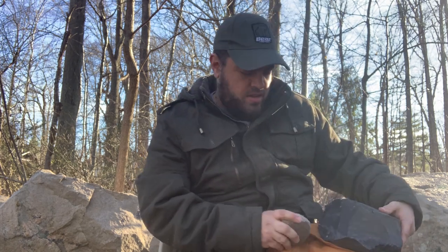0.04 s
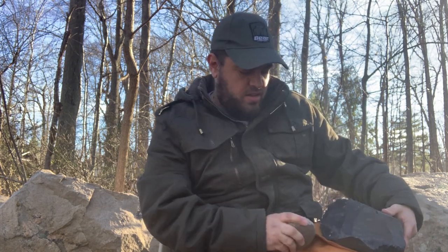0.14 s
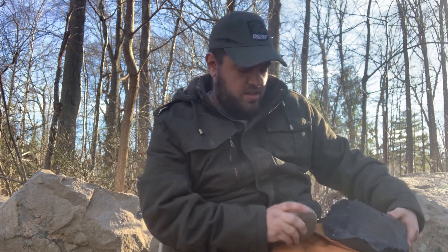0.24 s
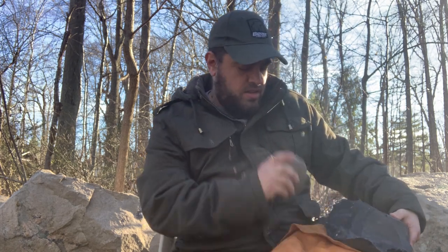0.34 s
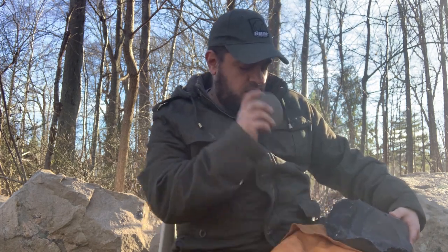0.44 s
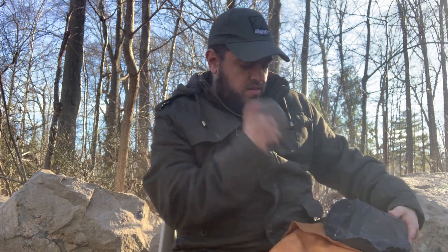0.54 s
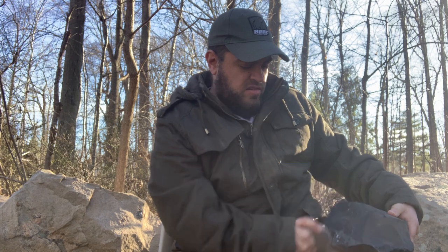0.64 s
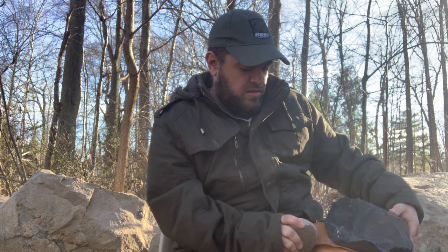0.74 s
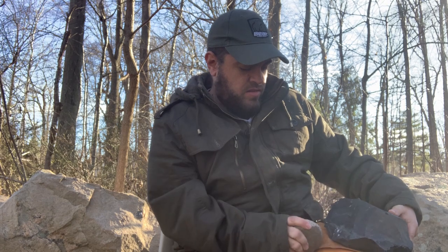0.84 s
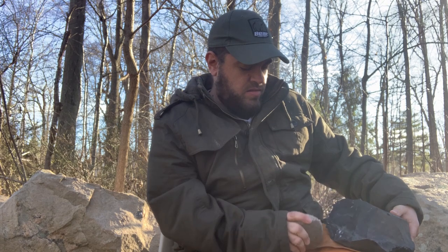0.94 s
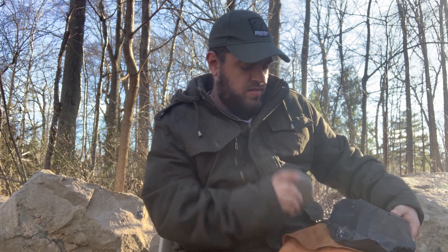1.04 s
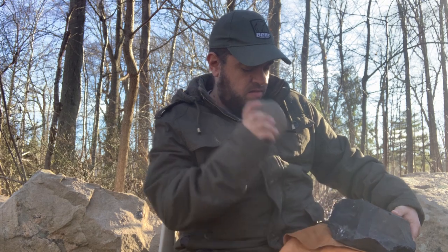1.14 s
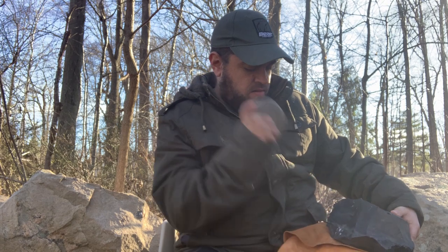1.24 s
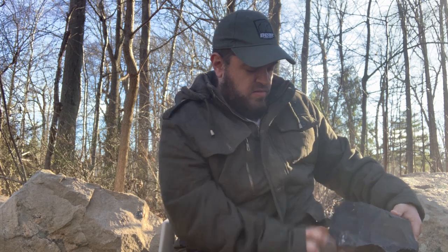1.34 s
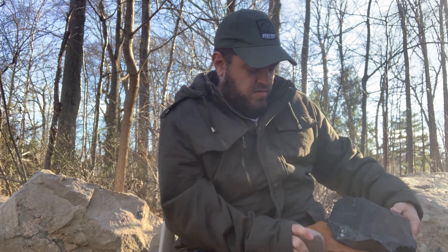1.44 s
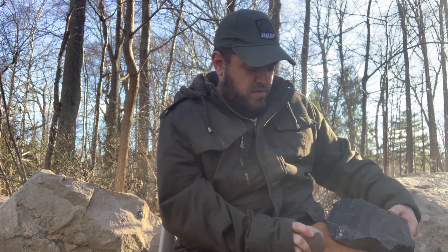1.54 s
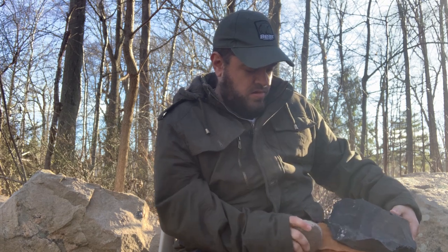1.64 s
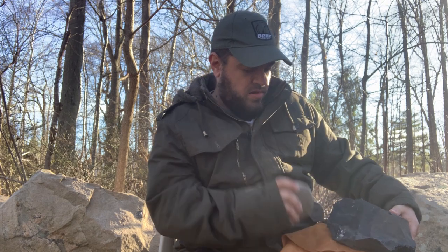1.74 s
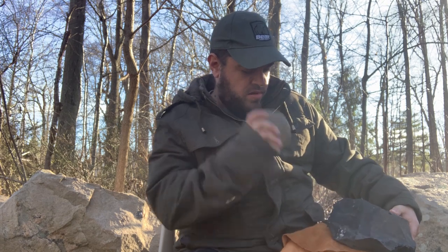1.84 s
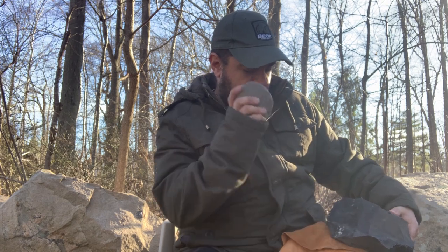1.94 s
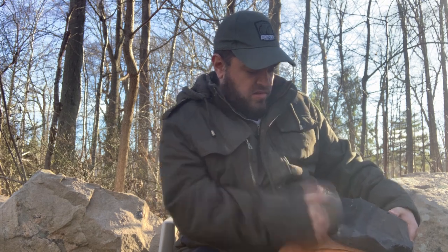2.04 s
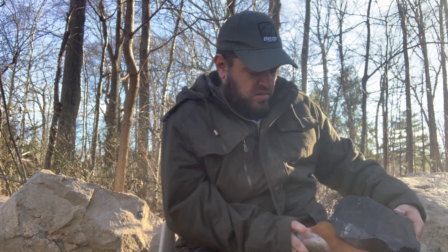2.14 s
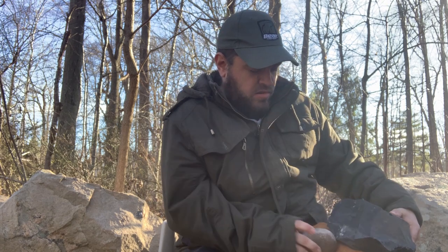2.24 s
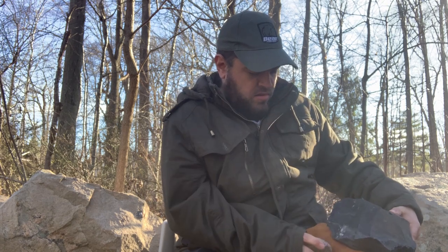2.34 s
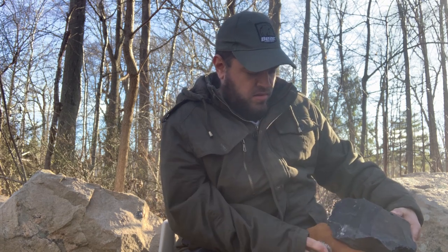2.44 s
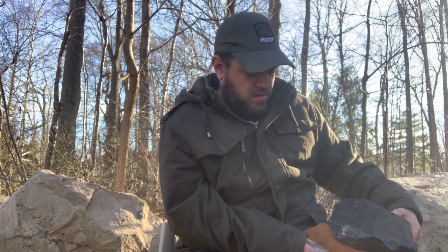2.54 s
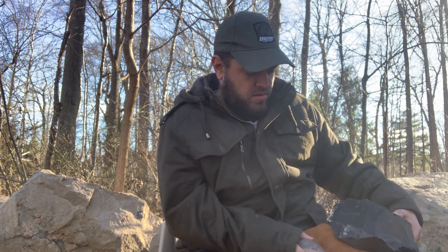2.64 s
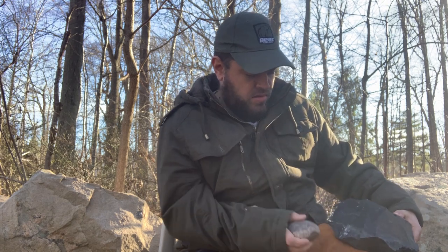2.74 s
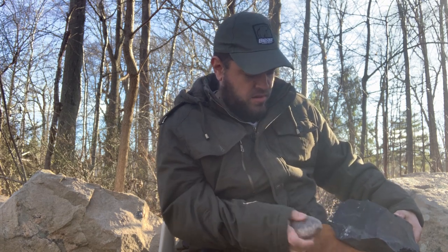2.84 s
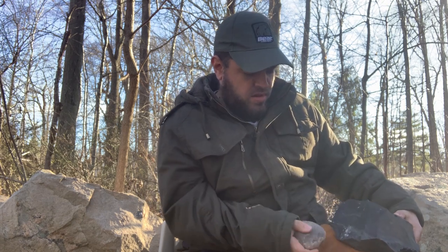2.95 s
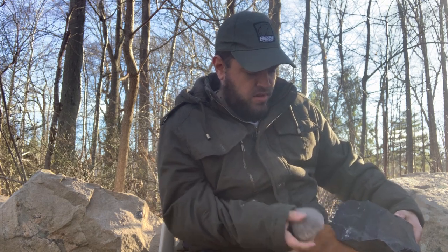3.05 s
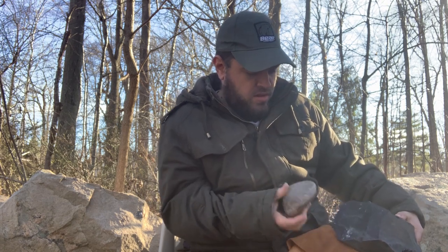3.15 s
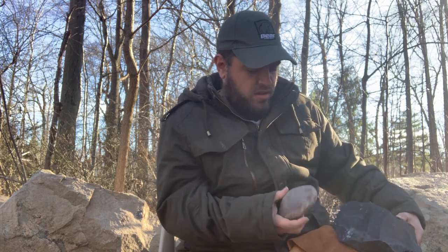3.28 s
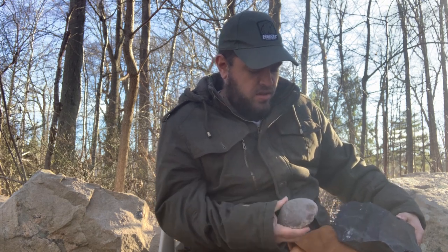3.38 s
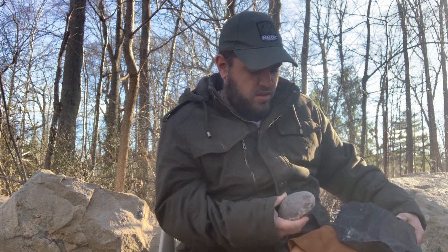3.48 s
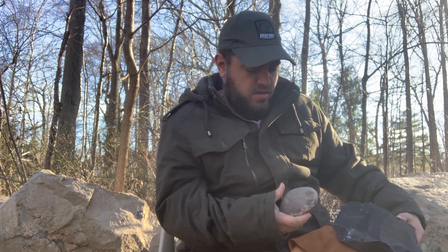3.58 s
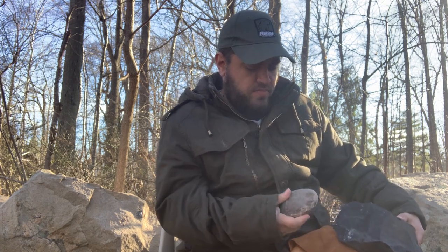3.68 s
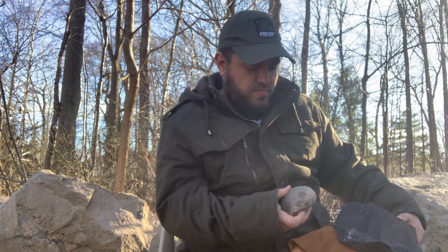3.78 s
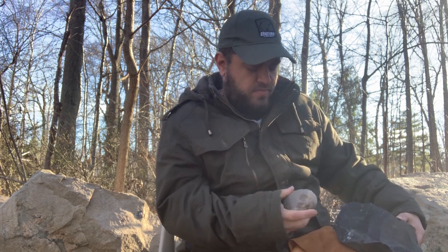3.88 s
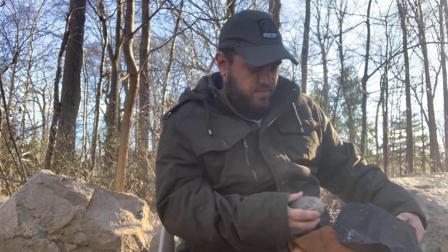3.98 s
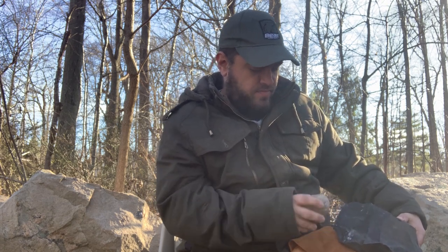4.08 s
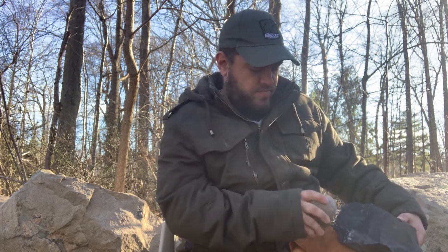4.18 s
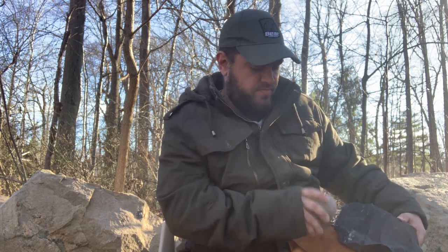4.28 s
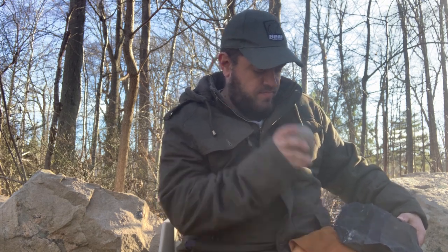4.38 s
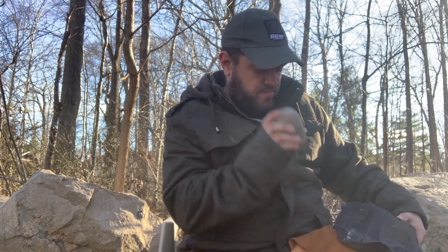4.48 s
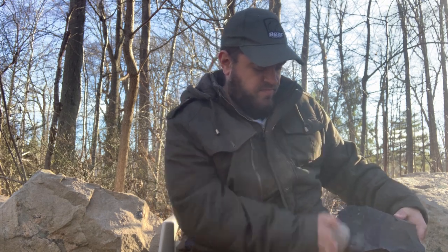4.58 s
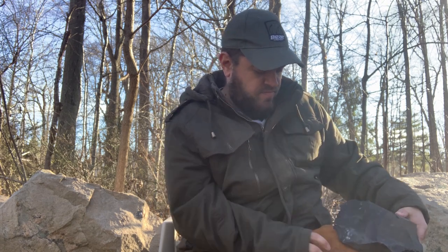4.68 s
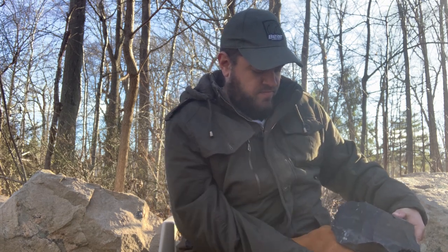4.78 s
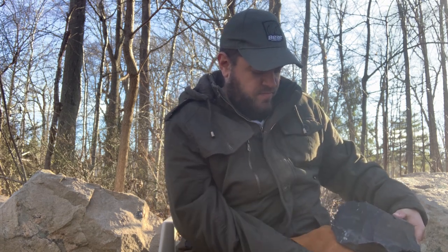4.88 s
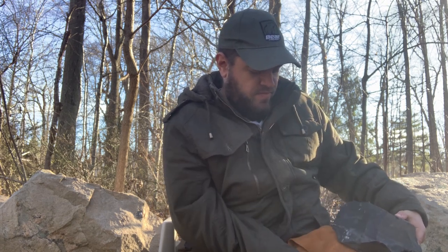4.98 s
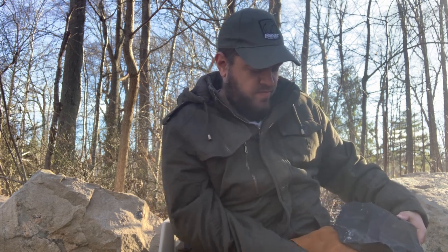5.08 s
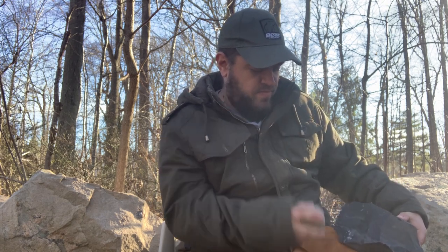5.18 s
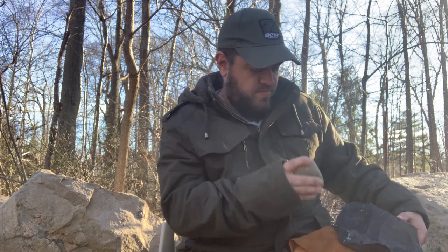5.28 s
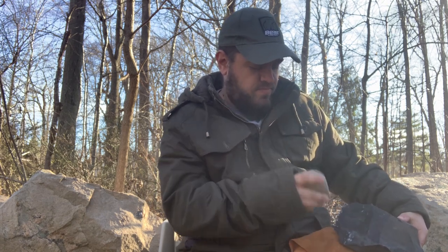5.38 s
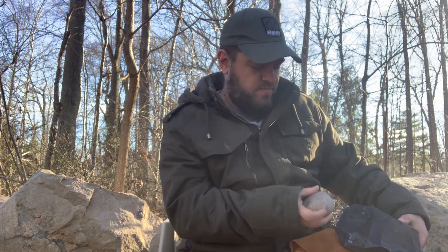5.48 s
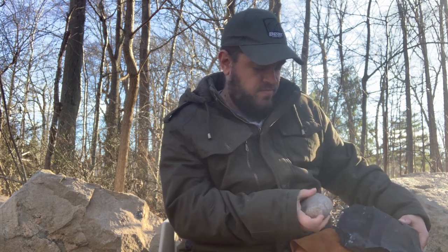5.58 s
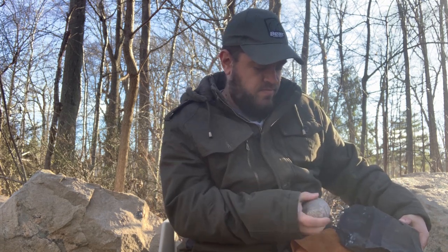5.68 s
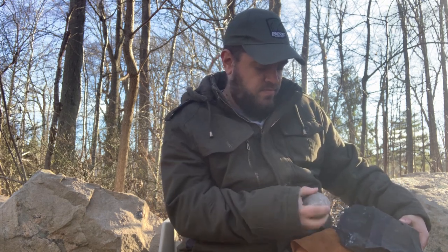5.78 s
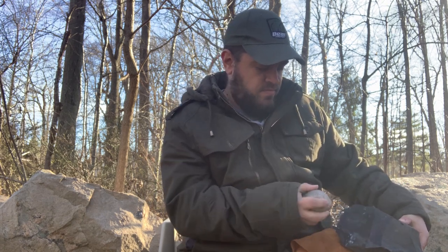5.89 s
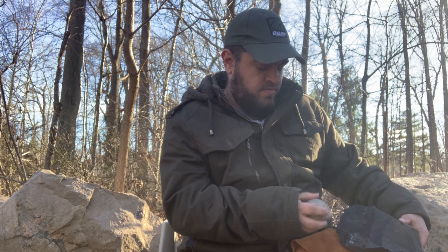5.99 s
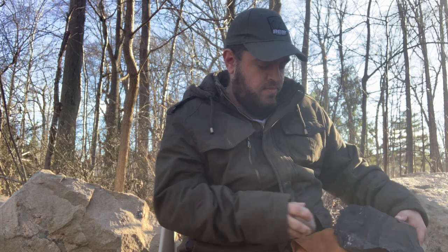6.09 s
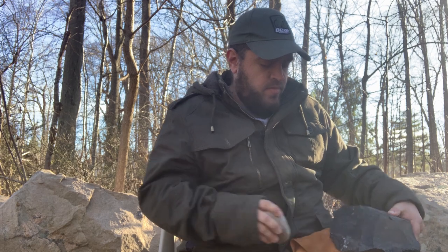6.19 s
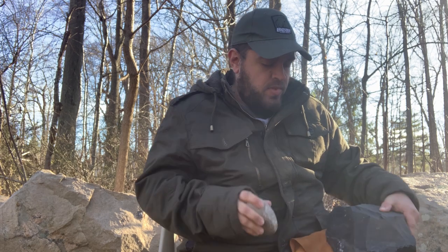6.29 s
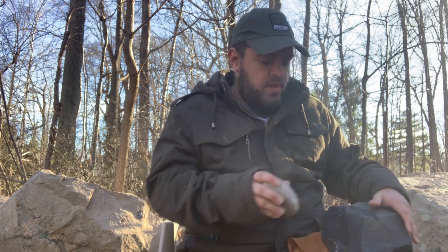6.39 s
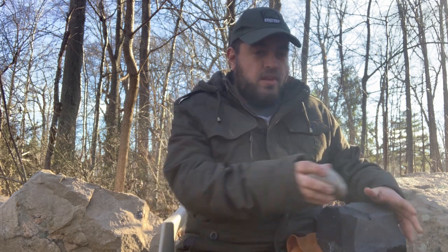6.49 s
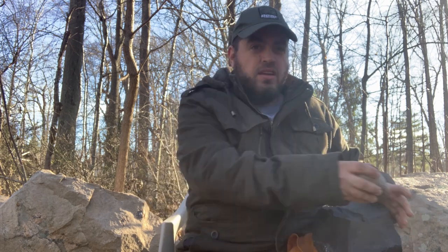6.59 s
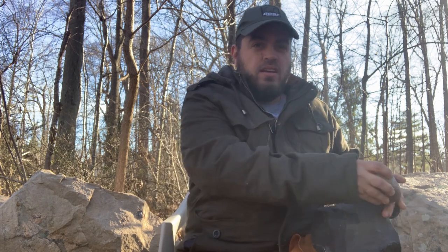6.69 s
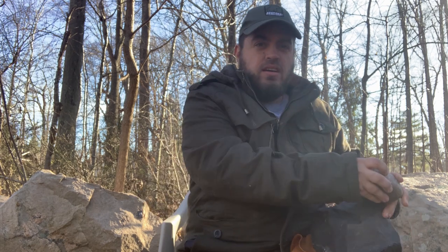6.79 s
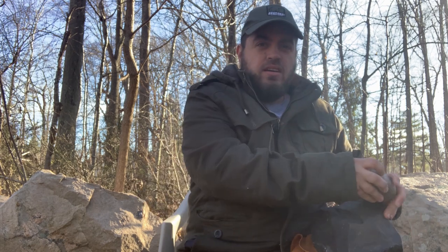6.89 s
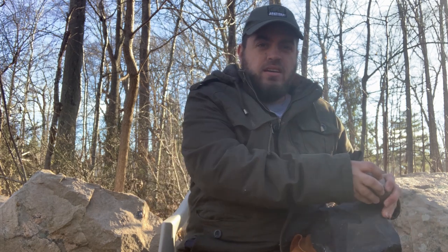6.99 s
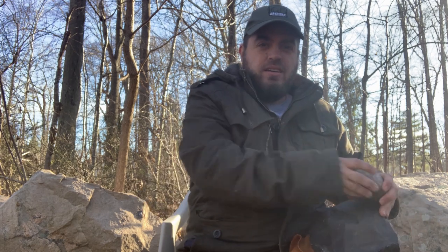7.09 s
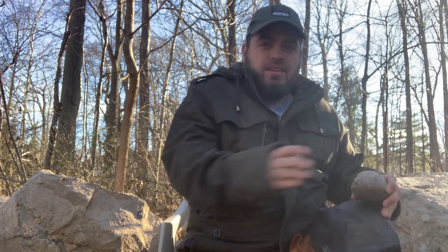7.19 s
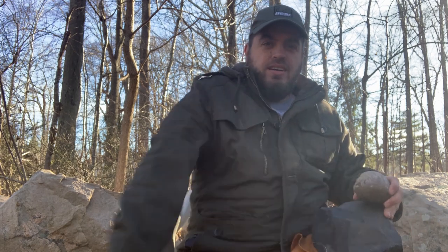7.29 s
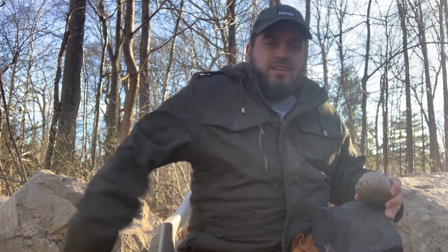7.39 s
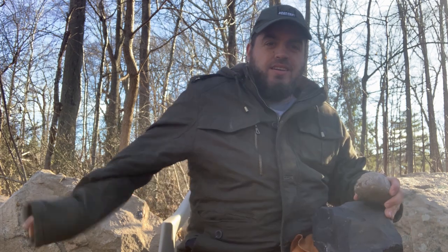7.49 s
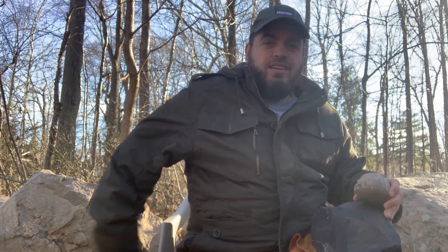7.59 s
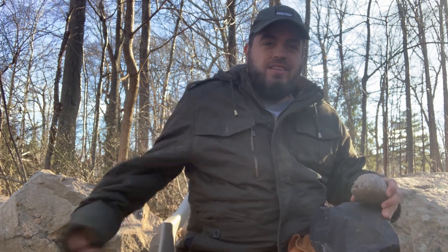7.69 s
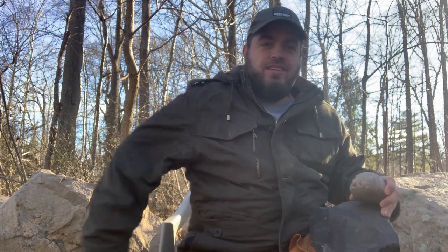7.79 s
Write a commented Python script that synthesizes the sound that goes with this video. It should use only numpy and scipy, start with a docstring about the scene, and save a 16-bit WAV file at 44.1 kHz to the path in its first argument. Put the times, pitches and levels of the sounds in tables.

```python
"""Quiet winter woodland, microphones close to a seated man who knocks four flakes off a flint core.
Three hammerstone blows come early and one after a pause: contact click, second sharp pulse, thud into the leg pad.
The loose flake knocks back after some of them, the trees answer with echoes and chips patter down.
His jacket rubs throughout; toward the end a small bird repeats two notes, a crow calls far off and the sleeve flaps.
Solid sounds are filtered pulses, bursts and dying sines, cloth and air are shaped noise, birds are gliding sines."""
import sys
import numpy as np
from scipy import signal
from scipy.fft import rfft, irfft
from scipy.io import wavfile

SR = 44100
rng = np.random.default_rng(int(sys.argv[2]) if len(sys.argv) > 2 else 0)


def file_out(sig):
    """Save sig as 16-bit WAV at sys.argv[1]."""
    # one column per channel
    cols = np.atleast_2d(sig).T
    # limit, then scale
    lim = np.clip(cols, -1, 1)
    pcm = np.round(lim * 32767).astype(np.int16)
    wavfile.write(sys.argv[1], SR, pcm)


N = 345303

# The four hammer blows. Each row: time in seconds, force in dB, relative thud in dB,
# brightness in dB per octave above 3 kHz, flake resonance in Hz, relative flake level in dB,
# relative ground knock in dB, grit in dB.
BLOWS = [(0.6229, -0.5, 1.5, 1, 2100, 18, 15, -16), (1.3269, 2, -2, -4, 3746, 24, 11, -6),
         (2.0656, 0.5, 4.5, 1, 2184, 17, 12, -13.5), (4.5727, -1, 1, -4, 3100, 25.5, 8, -12.5)]
# Colour of a dull knock of stone. Each row: frequency in Hz, relative level in dB.
KNOCK = [(100, -26.5), (600, -17), (1200, -5.5), (2000, 1), (3200, -4), (4500, -13), (6500, -24),
         (11000, -28.5), (16000, -37)]
# Colour of the echo from the trees. Each row: frequency in Hz, relative level in dB.
WOOD = [(100, -24), (700, -23.5), (1200, -12), (1700, -5.5), (2400, -4.5), (3300, -10), (4500, -12),
        (7000, -14.5), (16000, -27.5)]


def amp(db):
    """Decibels to gain."""
    return 10 ** (np.asarray(db) / 20)


def evened(x):
    """Scales to rms 1."""
    return x / np.sqrt(np.mean(x ** 2) + 1e-20)


def read(points, hz):
    """Reads a table on a log-frequency axis."""
    f, value = np.transpose(points)
    return np.interp(np.log(hz + 1), np.log(f + 1), value)


def add(mix, s, sound):
    """Mixes a sound in at a time in seconds."""
    part = mix[..., max(round(s * SR), 0):][..., :sound.shape[-1]]
    part += sound[..., :part.shape[-1]]


def convolve(a, b):
    """Convolves mono or stereo sounds, keeping the length of the first."""
    return signal.fftconvolve(np.atleast_2d(a), np.atleast_2d(b), axes=1)[:, :np.shape(a)[-1]]


def pan(right_db):
    """Gains of the left and right channel, right_db apart."""
    return amp(np.array([[-.5], [.5]]) * right_db)


def click(spectrum, tilt_db=0, lead_ms=0, size=8192):
    """The tightest causal (minimum-phase) pulse of this colour, reaching the left microphone lead_ms sooner."""
    hz = abs(np.fft.fftfreq(size, 1 / SR))
    octaves = np.log2(np.maximum(hz / 3000, 1))  # the tilt acts above 3 kHz
    log_gain = np.log(amp(read(spectrum, hz) + tilt_db * octaves))
    pulse = np.fft.ifft(np.exp(np.conj(signal.hilbert(log_gain)))).real
    pulse = np.roll(pulse, 6)  # room for the earlier channel
    lag = np.array([[-.5], [.5]]) * lead_ms / 1000
    shift = np.exp(-2j * np.pi * np.fft.rfftfreq(size, 1 / SR) * lag)
    pair = irfft(rfft(pulse) * shift)
    return pair * np.hanning(2 * size)[size:]


def burst(t60, same=0.94, per_s=SR, size=16384):
    """A stereo shower of tiny random impacts that dies 60 dB in t60 seconds, with energy 1."""
    t = np.arange(size) / SR
    impacts = rng.standard_normal((3, size)) * (rng.random(size) < per_s / SR)
    shared, *own = impacts
    same = np.clip(same, 0, 1)
    x = np.sqrt(same) * shared + np.sqrt(1 - same) * np.array(own)
    x = x * amp(-60 * t / t60)
    return evened(x * np.hanning(2 * size)[size:]) / np.sqrt(size)


def wander(per_s, size=N):
    """Slow chance with rms 1: noise held below about per_s swings a second."""
    lowpass = 1 + (np.fft.rfftfreq(size, 1 / SR) / per_s) ** 4
    return evened(irfft(rfft(rng.standard_normal(size)) / lowpass, size))


def noise(spectrum, band=(0, SR)):
    """Stereo noise of this colour with rms 1 inside the band in Hz; the bass is nearly mono."""
    # Likeness of left and right in the open. Each row: frequency in Hz, correlation from -1 to 1.
    likeness = [(60, .88), (130, .8), (290, .5), (640, -0.18), (1400, -0.39), (3100, .2), (15000, .2)]
    hz = np.fft.rfftfreq(N, 1 / SR)
    a, b = rfft(rng.standard_normal((2, N)))
    same = np.clip(read(likeness, hz), -1, 1)
    z = np.array([a, same * a + np.sqrt(1 - same ** 2) * b]) * amp(read(spectrum, hz))
    in_band = (hz >= band[0]) * (hz <= band[1])
    return irfft(z, N) / irfft(z * in_band, N).std()


def blows(contact_db=20.5, second_db=19, lead_in_db=10, scatter_db=11, thud_db=14, core_db=-24,
          second_delay_s=.00145, ground_s=.0033, flake_t60=0.044):
    """The hammerstone clicks on the core; a second sharp pulse, likely a close reflection, comes with the pad's thud."""
    # Colours of a blow: stone contact, second pulse, scatter from body and rocks, thud of the pad.
    # Each row: frequency in Hz, relative level in dB.
    contact = [(100, -24.5), (700, -25.5), (1200, -9), (2000, -11.5), (2800, -3.5), (3600, -14.5),
               (4600, -18), (6200, -9), (8500, -22), (11000, -30), (16000, -33.5)]
    second_pulse = [(100, -20.5), (750, -15.5), (1250, -4.5), (1900, -5.5), (2800, -11), (4000, -5),
                    (5000, -15), (7000, -18.5), (8700, -20), (10500, -9.5), (16000, -24)]
    scatter = [(100, -18), (450, 0), (730, -9), (1300, 0.5), (2000, 1), (3200, -1), (4500, -9.5),
               (6500, -10), (8700, -26), (11000, -24), (16000, -30)]
    thud = [(30, -22.5), (90, -4.5), (125, -7), (170, 3), (260, 0.5), (350, -4), (480, -7), (700, -12),
            (1200, -29.5), (4000, -69.5)]
    lead_in_s = 0.0042  # a short grainy burst leads into each contact
    out = np.zeros((2, N))
    for s, force_db, weight_db, bright_db, flake_hz, flake_db, ground_db, _ in BLOWS:
        force = amp(force_db)
        lead_in_rise = np.minimum(np.arange(16384) / SR / lead_in_s, 1)
        grains = burst(t60=.02, same=.8, per_s=9000) * lead_in_rise
        grains = grains / np.linalg.norm(grains[0])
        add(out, s - lead_in_s, force * amp(lead_in_db) * convolve(grains, click(contact, bright_db)))

        contact_click = pan(right_db=4) * click(contact, bright_db, lead_ms=-0.026)
        add(out, s, force * amp(contact_db) * contact_click)
        second = -click(second_pulse, bright_db, lead_ms=0.063)
        add(out, s + second_delay_s, force * amp(second_db) * second)
        thump = pan(right_db=2.5) * click(thud, lead_ms=0.19)
        add(out, s + second_delay_s, force * amp(weight_db + thud_db) * thump)

        # the running crack shakes the flake
        shaken = convolve(burst(flake_t60, same=.6), flake_pulse(flake_hz))
        add(out, s, amp(flake_db) * pan(right_db=2.5) * shaken)
        # the ground returns a duller copy; body and rocks scatter the rest
        add(out, s + ground_s, force * amp(ground_db) * click(KNOCK, lead_ms=0.032))
        scattered = convolve(burst(t60=.045, same=.6, per_s=6000), click(scatter, bright_db))
        add(out, s, force * amp(scatter_db) * pan(right_db=4.0) * scattered)
        add(out, s, force * amp(core_db) * ring(uneven_db=2.5))
    return out


def flake_pulse(flake_hz, width=.2):
    """One broad resonance of the flake, set by its size; the width is in octaves."""
    return click([(flake_hz * 2 ** (k * width), -6 * k * k) for k in range(-3, 4)])


def ring(uneven_db=0, size=8192):
    """Dying modes of the hand-damped core, stirred unevenly; each microphone hears its own phase."""
    # Modes of the core. Each row: frequency in Hz, relative level in dB.
    modes = [(1200, -4.5), (1410, -0.5), (1690, -1.5), (1990, -1.5), (2530, 3), (2870, 2), (3245, -4),
             (3905, -3.5), (4220, -7), (5630, -17.5), (6390, -13.5), (7970, -22), (11400, -23),
             (15300, -21.5)]
    core_t60 = .05  # seconds
    t = np.arange(size) / SR
    out = np.zeros((2, size))
    for hz, db in modes:
        fading_db = db + uneven_db * rng.uniform(-1, 1) - 60 * t / core_t60
        out += amp(fading_db) * np.sin(2 * np.pi * (hz * t + rng.random((2, 1))))
    return out


def rebounds(knock_db=16, core_db=-40, dulling=0.12):
    """The loosened flake knocks quickly back on the core; the softer the knock, the duller."""
    # Knocks of flake on core. Each row: time in seconds, relative level in dB.
    flake_knocks = [(0.6302, -10.5), (0.6387, -16.5), (0.647, -22), (1.3430, 0), (4.5856, -3),
                    (4.5965, -8.5), (4.6068, -16.5), (4.6178, -20.5), (4.6306, -32)]
    out = np.zeros((2, N))
    for s, db in flake_knocks:
        knock = -amp(knock_db) * click(KNOCK, dulling * db, lead_ms=.04)
        add(out, s, amp(db) * (knock + amp(core_db) * ring()))
    return out


def chips(landing_db=0):
    """Fine grit sprays from every blow; larger chips land on stone and leaves as a tick and a skitter."""
    # Landing chips. Each row: time in seconds, relative level in dB, brightness in dB per octave
    # above 3 kHz, 60 dB decay in seconds.
    landings = [(0.248, -20, -14.5, 0.11), (0.7600, -23, 1, 0.019), (0.7738, -23.5, -1.5, 0.19),
                (0.8025, -26, -9, .02), (0.8692, -23.5, 1.5, 0.036), (0.951, -50, 8, 0.013),
                (1.0605, -34.5, 3, 0.062), (1.472, -31, 2.5, 0.057), (1.9740, -28, 4.5, 0.016),
                (2.348, -26, -8, 0.019), (2.391, -42, 2, 0.021), (4.7423, -9.5, -2, 0.2),
                (4.75, -24, -7, .02), (4.999, -35, 2.5, 0.032), (6.52, -25, -11, 0.013),
                (7.728, -28, -4, 0.022)]
    # Colour of a chip. Each row: frequency in Hz, relative level in dB.
    chip_colour = [(100, -17.5), (1000, -10), (3000, -6.5), (7000, -5.5), (8700, -13), (11000, -4.5),
                   (16000, -7.5)]
    out = np.zeros((2, N))
    for s, *_, grit_db in BLOWS:
        grit = convolve(burst(t60=.25, per_s=4000), click(chip_colour, tilt_db=-1))
        add(out, s + .01, amp(grit_db) * grit)
    for s, db, bright_db, t60 in landings:
        first_tick = .5 * np.eye(1, 16384)  # a single impulse
        skitter = burst(t60, same=.6, per_s=4000) + first_tick
        add(out, s, amp(db + landing_db) * convolve(skitter, click(chip_colour, bright_db)))
    return out


def trunks(echo_db=-1, bark_db=0):
    """Near trunks each throw a blow back as one soft, dull knock, smeared by their bark."""
    # Single trunks. Each row: echo delay in seconds, relative level in dB.
    trunk_echoes = [(.0415, -18), (.0565, -18), (.079, -3), (.118, -13)]
    out = np.zeros((2, N))
    knock = click(WOOD, tilt_db=-22, lead_ms=.05)
    for s, *_ in BLOWS:
        for delay, db in trunk_echoes:
            smear = convolve(knock, burst(t60=0.011, same=1.0))
            add(out, s + delay, amp(db + echo_db) * (knock + amp(bark_db) * smear))
    return out


def far_echo(crack_db=19, flake_share_db=-7):
    """The woods return each crack, broadly tinted by its flake, as a diffuse wash."""
    cracks = np.zeros((2, N))
    for s, force_db, _, bright_db, flake_hz, flake_db, *_ in BLOWS:
        tint = amp(flake_db + flake_share_db) * flake_pulse(flake_hz, width=.55)
        add(cracks, s, amp(crack_db + force_db) * click(KNOCK, bright_db + 3.5))
        add(cracks, s + .004, tint)
    return woodland(cracks, tail_db=-22.5, build_s=.08)


def woodland(x, tail_db=-24, build_s=.09):
    """The many far trees swell into a soft, grainy tail: sparse random taps dying at a rate set by pitch."""
    # Decay among the trees. Each row: frequency in Hz, 60 dB decay in seconds.
    wood_decay = [(200, .6), (1200, 0.56), (2400, 1.2), (5000, 0.85), (12000, 0.2)]
    sparse = rng.random((2, SR)) < 1500 / SR
    taps = rng.standard_normal((2, SR)) * sparse * amp(wander(per_s=23, size=SR))
    hz, t, z = signal.stft(taps, SR, nperseg=256)
    build = 1 - np.exp(-t / build_s)
    z = z * amp(-60 * t / read(wood_decay, hz)[:, None]) * build
    tail = amp(tail_db) * evened(signal.istft(z, SR, nperseg=256)[1]) / np.sqrt(SR)
    return convolve(x, convolve(tail, click(WOOD)))


def jacket(rub_db=-1.0, weave_db=0, grain_db=2, scuff_db=1.5):
    """Cloth rubs in uneven grains of noise; the sleeve flaps and bumps."""
    # Colours of the cloth: rub, fine hiss of the weave, soft bump.
    # Each row: frequency in Hz, relative level in dB.
    rub_colour = [(150, -21.5), (600, -12), (1500, 4), (3200, 4), (5000, 0.5), (7000, -5), (8700, -12),
                  (11000, -9), (16000, -18)]
    weave_colour = [(300, -62), (6000, -16), (8700, -12.5), (10500, -4), (12500, -1), (15000, 0.5),
                    (16000, -7)]
    bump_colour = [(40, -18.5), (150, -16.5), (400, -0.5), (750, -14), (1500, -15), (4000, -40),
                   (16000, -76)]
    # Soft bumps of the sleeve and the leg pad. Each row: time in seconds, relative level in dB.
    soft_bumps = [(0.58, 3), (2.276, -2), (7.462, -12.5), (7.503, -5.5), (7.652, -11.5)]
    rub, weave = cloth_motion()
    hiss = amp(rub_db) * rub * noise(rub_colour, band=(5200, 6900))
    hiss = hiss + amp(weave_db) * weave * noise(weave_colour, band=(10000, 15000))
    grains = evened(amp(grain_db * wander(per_s=280) + scuff_db * wander(per_s=30)))

    # the sleeve flaps as the arm swings out
    flap_start_s, flap_rise_s, flap_db, flutter_db = 7.136, 0.32, -60, 3.5
    arm_speed = np.clip((np.arange(N) / SR - flap_start_s) / flap_rise_s, 0, 1)
    flap = amp(flap_db) * arm_speed * noise(bump_colour, band=(200, 600))
    flutter = evened(amp(flutter_db * wander(per_s=35)))

    out = hiss * grains + flap * flutter
    for s, db in soft_bumps:
        add(out, s, amp(db) * convolve(click(bump_colour), burst(t60=.04, same=.8)))
    return out


def cloth_motion():
    """Loudness of the rub and of the weave's hiss: idle fidgeting, single strokes, a brief hiss into each blow."""
    # Strokes of the moving arms. Each row: middle in seconds, nominal length in seconds,
    # relative rub in dB, relative fine hiss of the weave in dB.
    strokes = [(1.828, 0.12, -78.5, -81), (2.295, .16, -77, -88), (2.548, 0.077, -72, -74),
               (2.754, 0.19, -85.5, -84), (2.888, 0.07, -76, -79), (3.05, .17, -75.5, -87),
               (3.312, .09, -84.5, -75.5), (3.77, 0.092, -86, -91), (4.229, 0.21, -85, -73.5),
               (4.43, 0.1, -84, -72), (4.675, 0.1, -69, -66.5), (4.945, 0.15, -75, -81),
               (5.056, 0.061, -70, -75.5), (5.47, 0.096, -79, -81), (5.782, 0.42, -102, -84),
               (6.152, 0.21, -79, -76), (6.381, 0.098, -80.5, -73.5), (6.54, 0.1, -77.5, -86),
               (6.894, .035, -101, -68.5), (7.289, 0.11, -76.5, -82), (7.48, 0.07, -76.5, -73),
               (7.58, 0.097, -74.5, -83), (7.725, 0.064, -71.5, -67.5), (7.82, .06, -74, -80)]
    stroke_edge = 2.5  # how squarely a stroke starts and stops
    fidget_db, fidget_sway_db, fidget_per_s = -94, 2.5, 4.5  # the cloth is never quite still
    lead_hiss_db, lead_hiss_rise_db_per_s = -61.5, 300  # a brief hiss rises steeply into each blow
    t = np.arange(N) / SR
    rub = weave = amp(fidget_db + fidget_sway_db * wander(per_s=fidget_per_s))
    for s, length, rub_db, weave_db in strokes:
        stroke = np.exp(-.5 * abs(2 * (t - s) / length) ** stroke_edge)
        rub = np.hypot(rub, amp(rub_db) * stroke)
        weave = np.hypot(weave, amp(weave_db) * stroke)
    for s, *_ in BLOWS:
        rub = rub + (t < s) * amp(lead_hiss_db - lead_hiss_rise_db_per_s * abs(s - t))
    return rub, weave


def birds(wet_db=-2, farness=0.12, near_db=-54.5):
    """The two-note song and a few single calls; the fainter a bird, the more of it is echo."""
    # Thin chirps and a far crow. Each row: start in seconds, length in seconds, start, middle and
    # end pitch in Hz, direct level in dB before panning.
    single_calls = [(1.807, 0.032, 6260, 7320, 7460, -71.5), (5.588, .04, 6300, 7180, 7420, -73.5),
                    (5.905, 0.057, 5100, 5030, 5140, -82), (6.6, .05, 3230, 2966, 2485, -80),
                    (6.966, 0.091, 2700, 3430, 2687, -79), (7.0, 0.1, 1600, 1530, 1450, -67),
                    (7.255, 0.091, 1483, 1541, 1450, -66), (7.565, 0.079, 1526, 1526, 1410, -62.5)]
    # A small bird's low and high whistle. Each row: start in seconds, low note and high note
    # direct level in dB before panning.
    song = [(5.94, -69, -63), (6.402, -59.5, -59.5), (6.86, -60, -58), (7.33, -58, -54.5), (7.8, -61, -57)]
    high_after_s, song_waver = .197, 0.003  # wait for the high note; pitch waver as a share
    call_waver_hz, call_fade_db = 60, 3  # roughness of the pitch; fade along a call
    notes = []
    for s, length, start_hz, middle_hz, end_hz, db in single_calls:
        call = whistle(length, start_hz, middle_hz, end_hz, call_fade_db, call_waver_hz / middle_hz)
        notes.append((s, db, call))
    for s, low_db, high_db in song:
        low = whistle(0.147, 3680, 3690, 3765, fade_db=1.3, waver=song_waver)
        high = whistle(0.11, 4480, 4425, 4430, fade_db=12, waver=song_waver)
        notes += [(s, low_db, low), (s + high_after_s, high_db, high)]
    direct, echoed = np.zeros((2, N))
    for s, db, note in notes:
        add(direct, s, amp(db) * note)
        add(echoed, s, amp(db + wet_db + farness * (near_db - db)) * note)
    return direct * pan(right_db=-4.5) + woodland(echoed, tail_db=2.5, build_s=0.025)


def whistle(length, start_hz, middle_hz, end_hz, fade_db, waver, flutter_db=1.6, size=16384):
    """A nearly pure note of rms about 1 that glides through three pitches as it fades."""
    u = np.linspace(0, 1, int(length * SR))
    glide = np.polyfit([0, .5, 1], [start_hz, middle_hz, end_hz], 2)
    hz = np.polyval(glide, u)
    hz = hz * (1 + waver * wander(per_s=750, size=size)[:len(u)])
    flutter = flutter_db * wander(per_s=63, size=size)[:len(u)]
    swell = signal.windows.tukey(len(u), .35) * amp(fade_db * (.5 - u) + flutter)
    return np.sqrt(2) * swell * np.sin(2 * np.pi * np.cumsum(hz) / SR)


def air(rumble_share=0.39, rush_share=0.98, fizz_share=.45, rumble_db=-1, fizz_db=5,
        rumble_sway_db=1.26, rush_sway_db=.5):
    """Outdoor air: gusty low rumble, far-off rush and faint fizz follow one slow swell by different amounts."""
    # Colour of still air. Each row: frequency in Hz, relative density in dB per Hz.
    air_colour = [(15, -40), (28, -19.5), (45, -7.5), (80, -3.5), (130, -11), (230, -21.5), (480, -24.5),
                  (900, -19), (1500, -26), (2400, -40), (3600, -48), (5700, -58), (8700, -61.5),
                  (13000, -58.5), (16000, -66)]
    # Swell of the far-off rush, used about its mean. Each row: time in seconds, relative level in dB.
    distant_swell = [(0.0, -62.5), (0.89, -64), (1.05, -62.5), (2.59, -68.5), (6.35, -72), (7.5, -70),
                     (7.83, -65)]
    # Soft gusts that lift the rumble. Each row: middle in seconds, nominal length in seconds, lift in dB.
    soft_gusts = [(0.2, 0.75, 3.5), (1.103, 0.59, 3), (3.704, .7, 2.5), (5.851, .4, 2)]
    t = np.arange(N) / SR
    bed = amp(-55.5) * noise(air_colour) * pan(right_db=1.1)
    low = signal.sosfiltfilt(signal.butter(2, 170, fs=SR, output="sos"), bed)
    high = signal.sosfiltfilt(signal.butter(2, 4500, "high", fs=SR, output="sos"), bed)
    swell = np.interp(t, *np.transpose(distant_swell))
    swell = swell - swell.mean()
    gust_db = sum(db * np.exp(-(2 * (t - s) / length) ** 4) for s, length, db in soft_gusts)
    rumble_sway = rumble_sway_db * wander(per_s=3)
    rumble = low * amp(rumble_db + gust_db + rumble_share * swell + rumble_sway)
    rush = (bed - low - high) * amp(rush_share * swell + rush_sway_db * wander(per_s=1.8))
    fizz = high * amp(fizz_db + fizz_share * swell)
    return rumble + rush + fizz


def scene():
    """The knapper close by, the birds and the woods around him."""
    knapping = blows() + rebounds() + chips()
    echoes = trunks() + far_echo()
    return knapping + echoes + jacket() + birds() + air()


def record(dry, threshold_db=-24, squeeze=0.36, recover_db_per_s=72):
    """The cracks overload the input softly and make the gain control duck for a moment; then the band limit."""
    ceiling, duck_attack_s, edge_hz = .9, .045, 16100
    loaded = ceiling * np.tanh(dry / ceiling)
    power = signal.lfilter(np.ones(128) / 128, 1, (loaded ** 2).mean(0))
    power_db = 10 * np.log10(power + 1e-12)
    # the level reading jumps up at once and sinks at a steady rate
    fall = np.arange(N) * recover_db_per_s / SR
    held_db = np.maximum.accumulate(power_db + fall) - fall
    over_db = np.maximum(held_db - threshold_db, 0)
    step = 1 / (duck_attack_s * SR)
    duck_db = squeeze * signal.lfilter([step], [1, step - 1], over_db)
    band_limit = signal.firwin(511, edge_hz, window=("kaiser", 9), fs=SR)
    return signal.oaconvolve(loaded * amp(-duck_db), band_limit[None], "same")


dry = scene()
out = record(dry)
file_out(out)
```